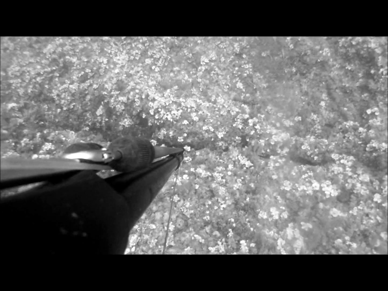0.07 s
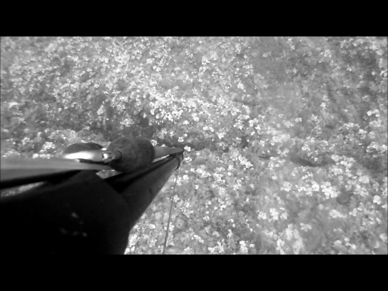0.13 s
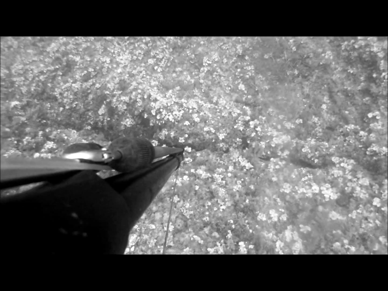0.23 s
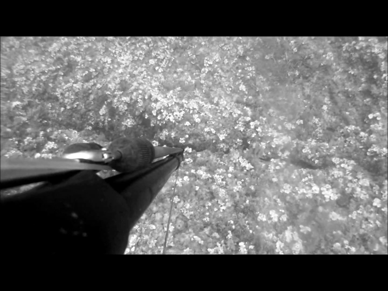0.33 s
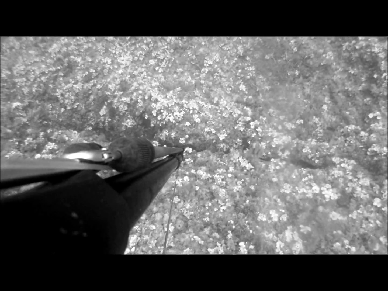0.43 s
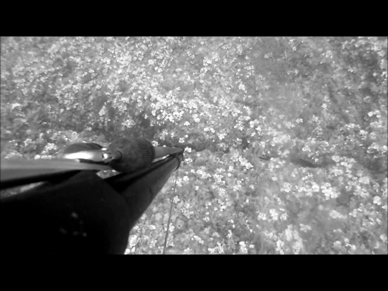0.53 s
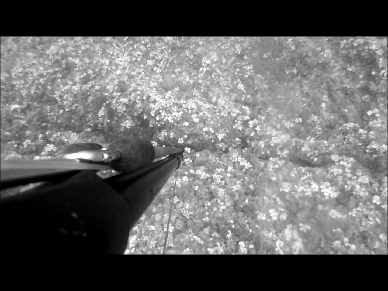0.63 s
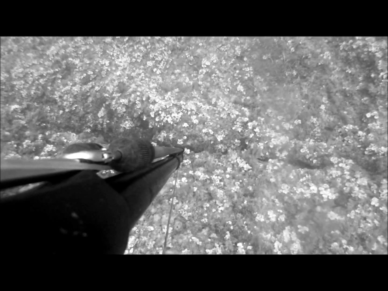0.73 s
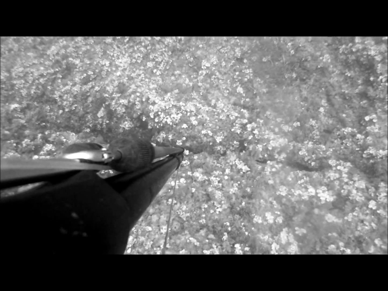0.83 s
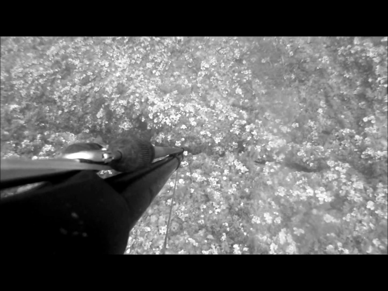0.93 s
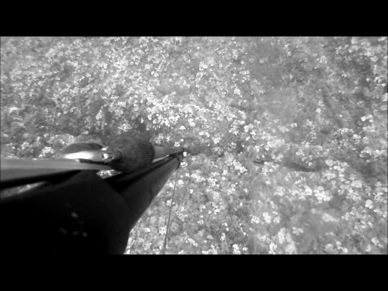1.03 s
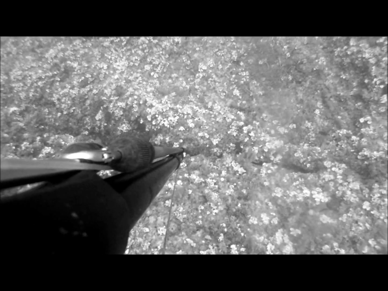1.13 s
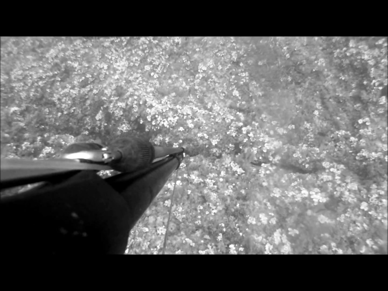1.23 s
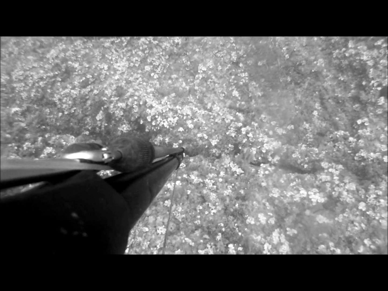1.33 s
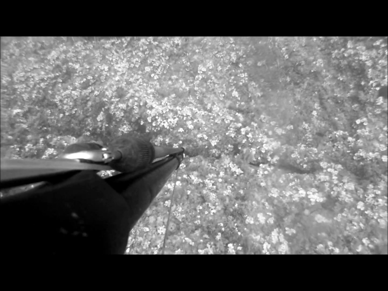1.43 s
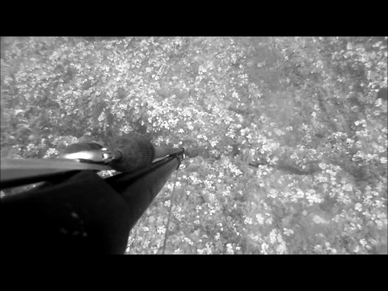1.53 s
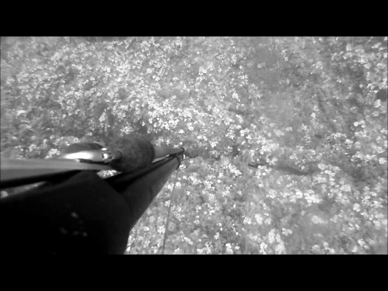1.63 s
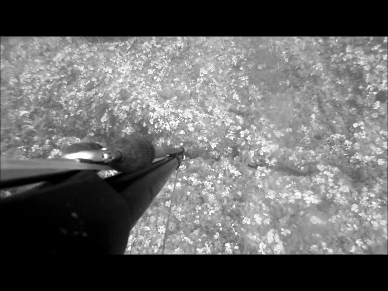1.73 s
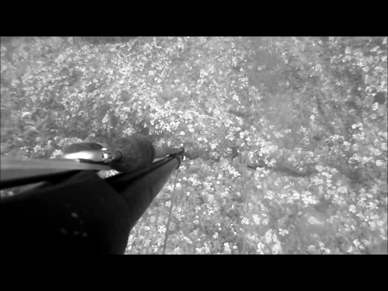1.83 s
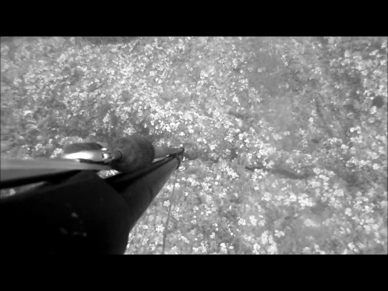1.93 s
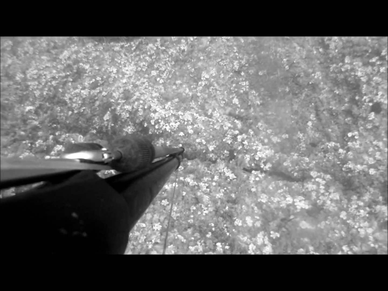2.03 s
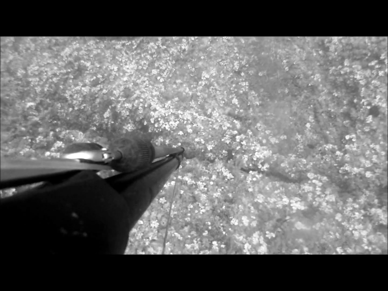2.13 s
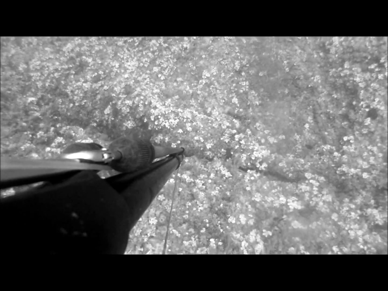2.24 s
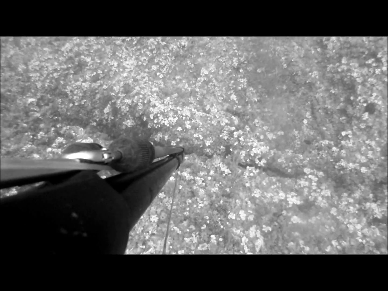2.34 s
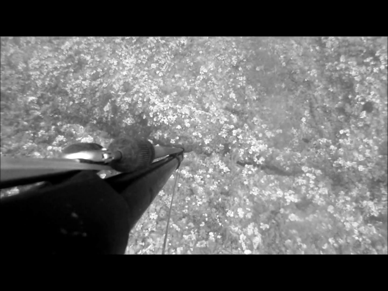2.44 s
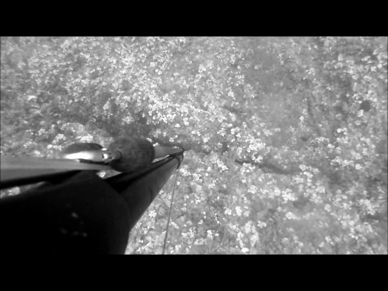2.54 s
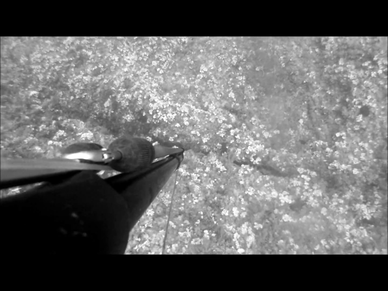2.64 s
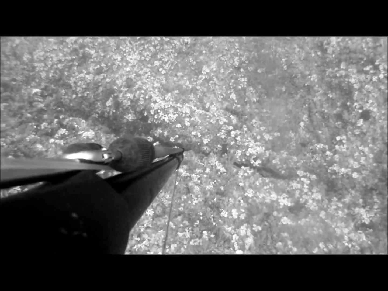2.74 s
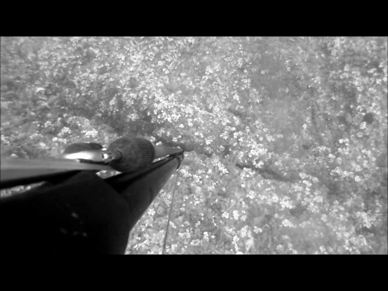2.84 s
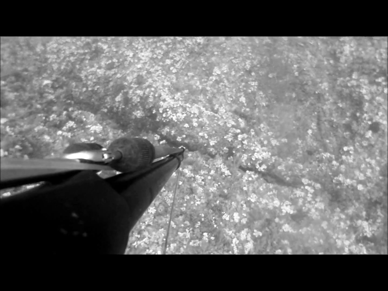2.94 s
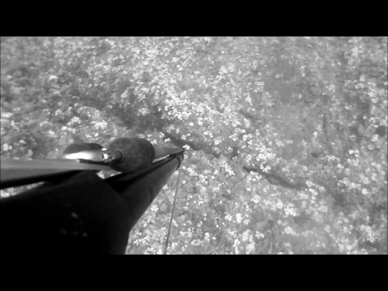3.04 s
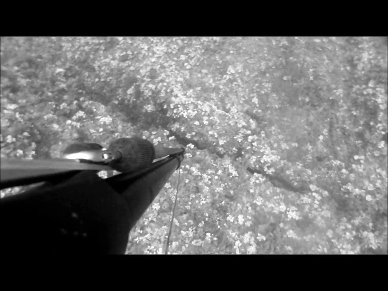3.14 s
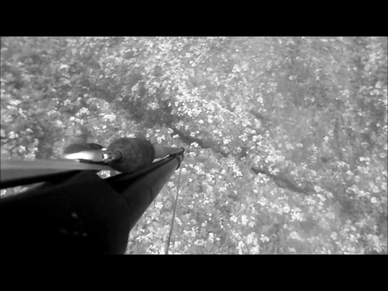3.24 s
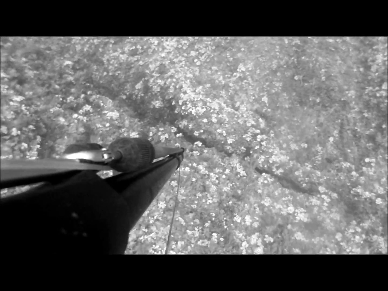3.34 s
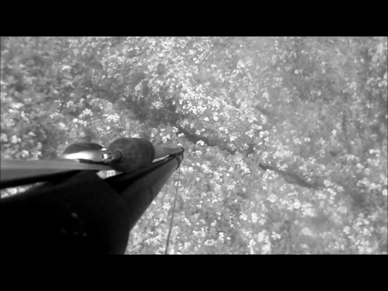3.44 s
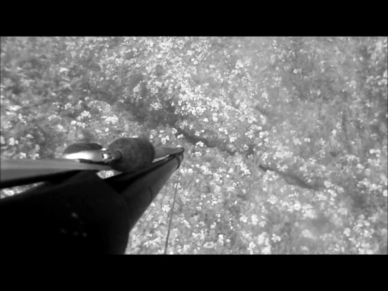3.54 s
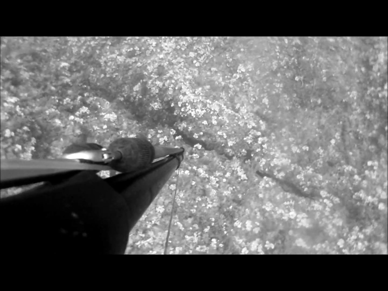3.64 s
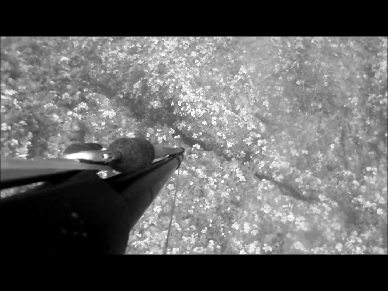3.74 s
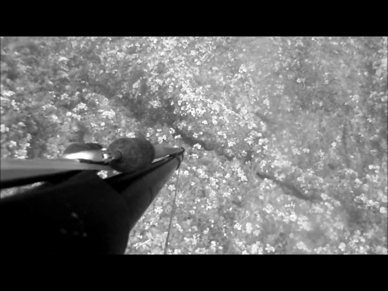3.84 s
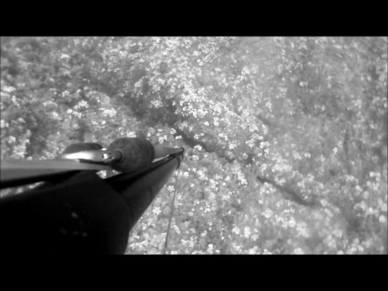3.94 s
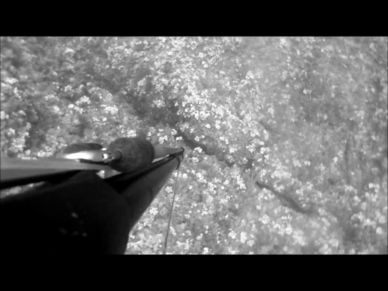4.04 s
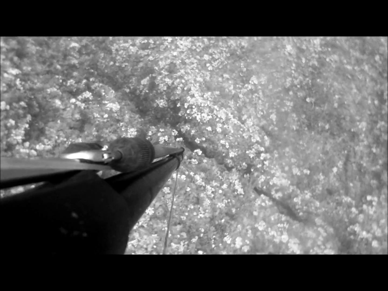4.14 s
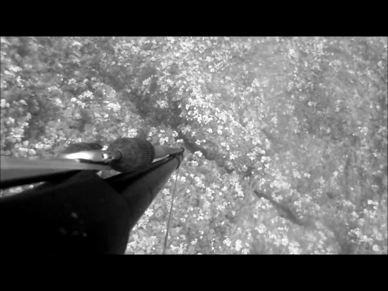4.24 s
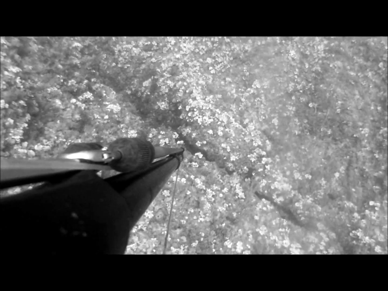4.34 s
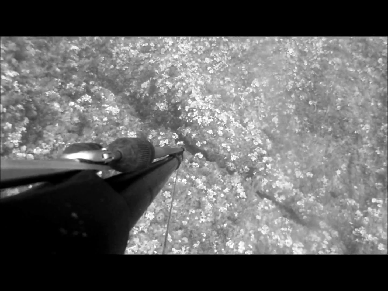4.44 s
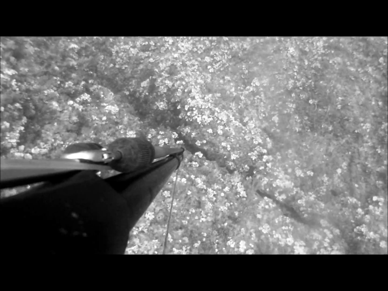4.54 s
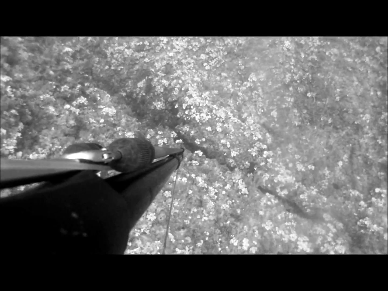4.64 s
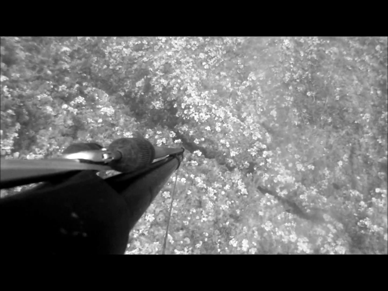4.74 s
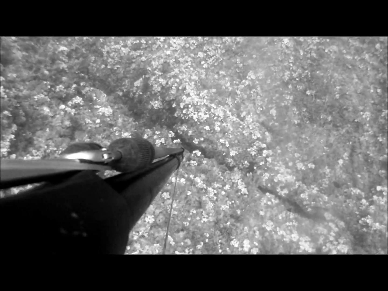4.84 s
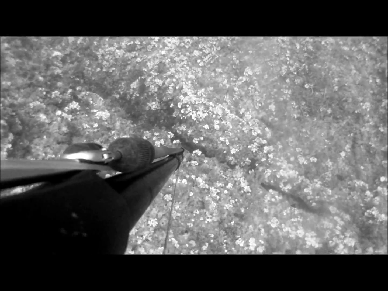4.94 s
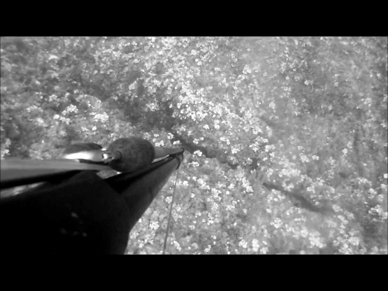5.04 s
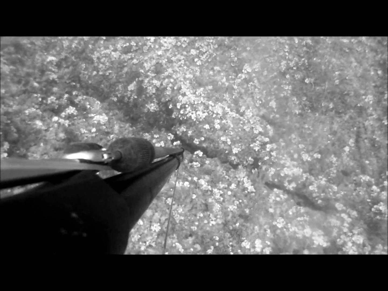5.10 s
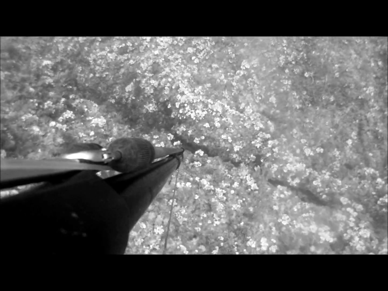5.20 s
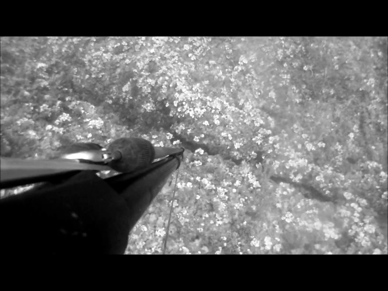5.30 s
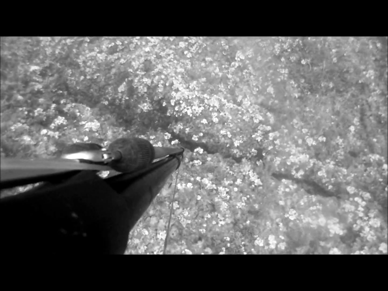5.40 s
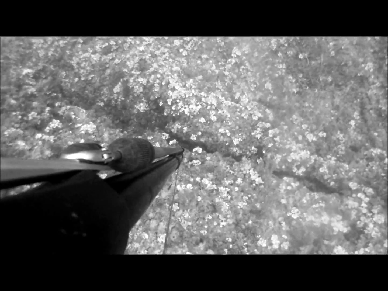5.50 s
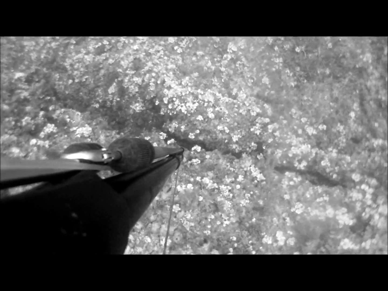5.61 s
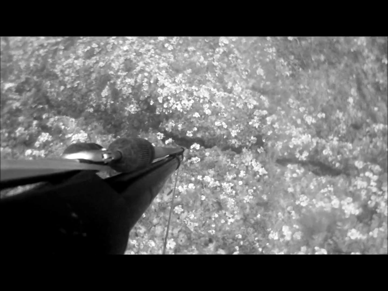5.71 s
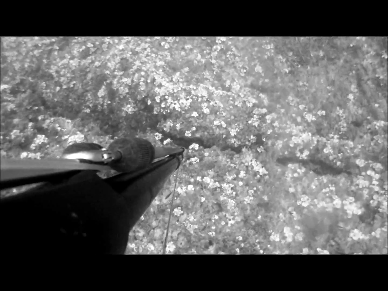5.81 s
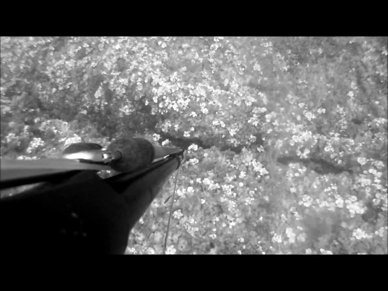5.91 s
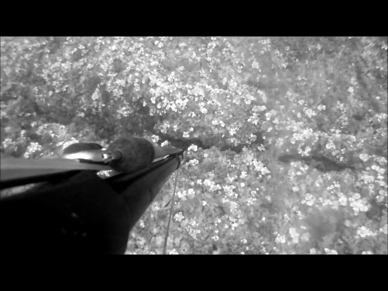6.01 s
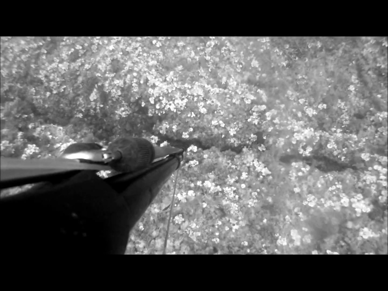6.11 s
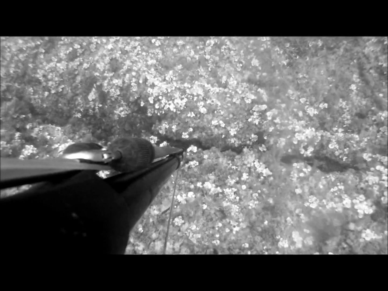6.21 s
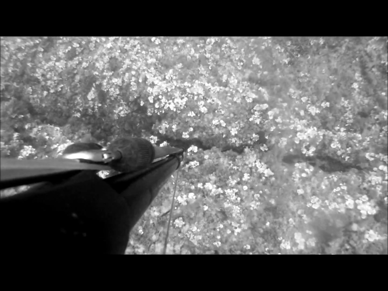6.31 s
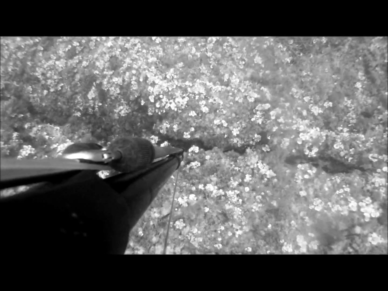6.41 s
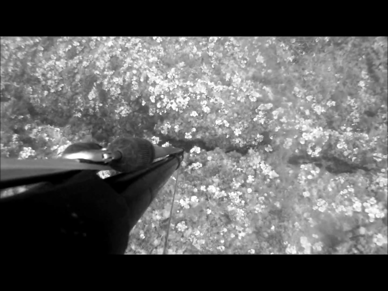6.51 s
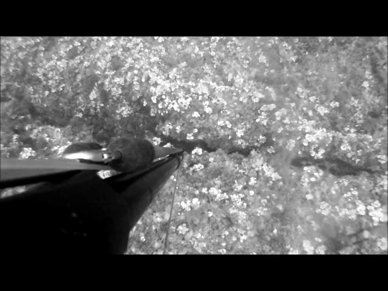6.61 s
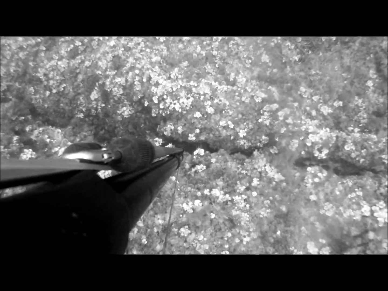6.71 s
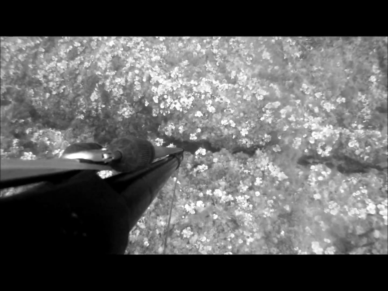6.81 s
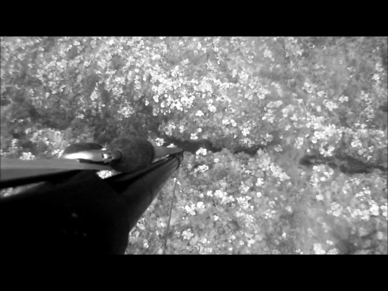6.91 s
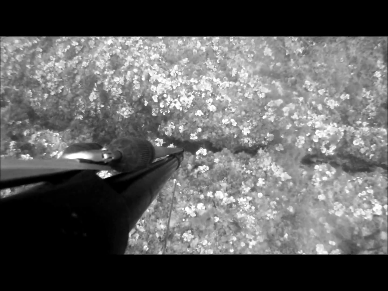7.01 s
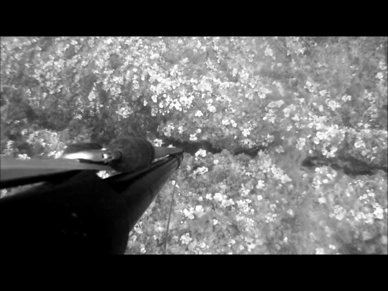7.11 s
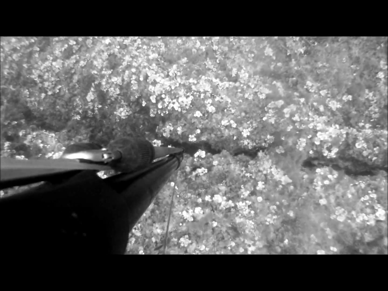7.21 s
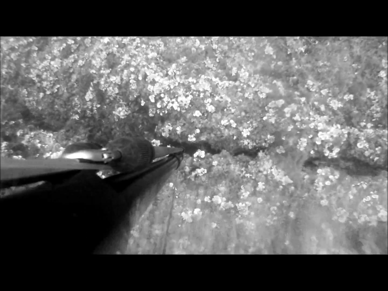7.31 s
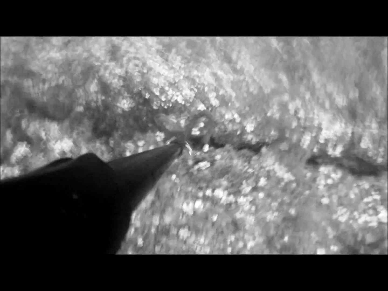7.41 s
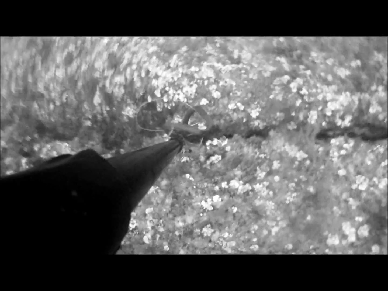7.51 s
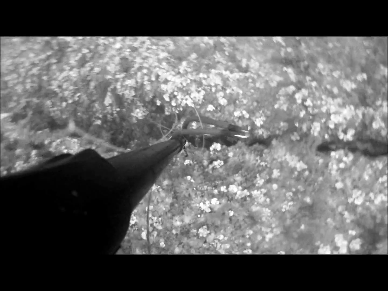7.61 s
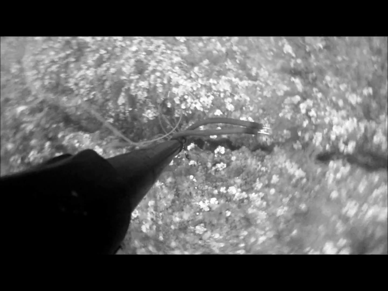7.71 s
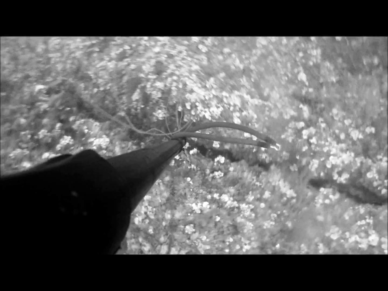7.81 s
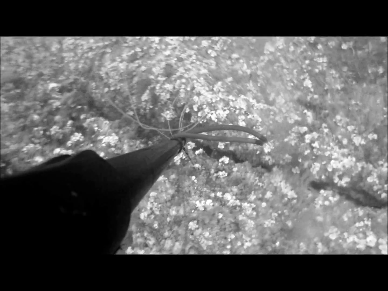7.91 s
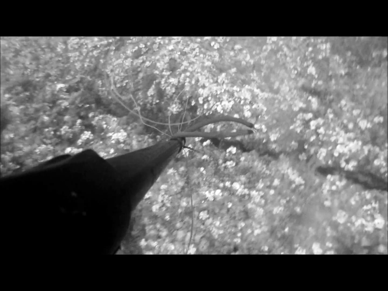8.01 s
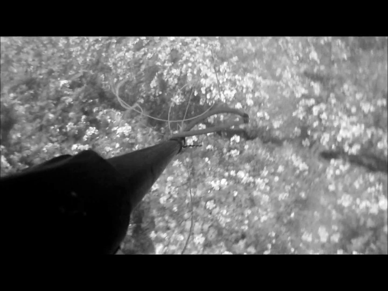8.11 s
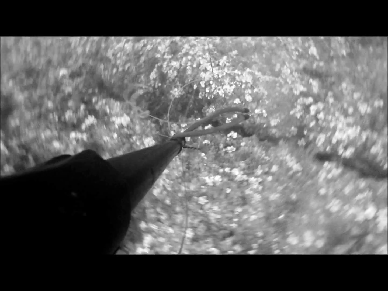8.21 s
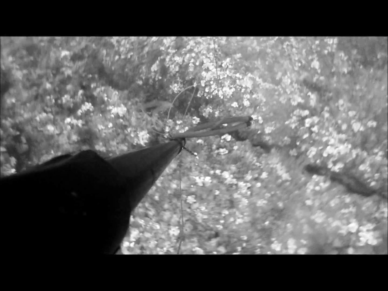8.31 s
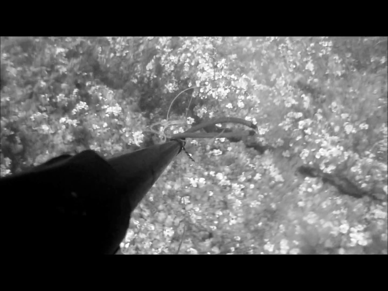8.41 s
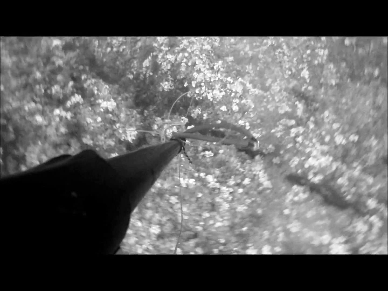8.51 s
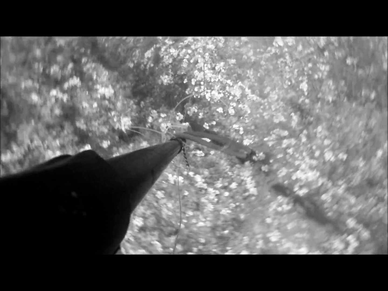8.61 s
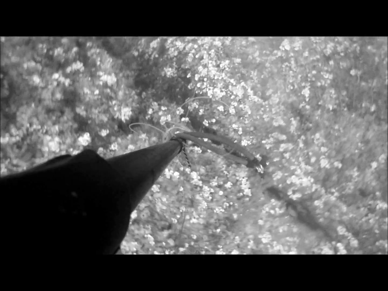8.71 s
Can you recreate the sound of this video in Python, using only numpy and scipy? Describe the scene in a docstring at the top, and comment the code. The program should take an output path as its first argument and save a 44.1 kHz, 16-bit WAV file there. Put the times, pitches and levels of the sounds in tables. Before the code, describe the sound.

Under the sea, a quiet bed of tiny shrimp clicks, hiss and deep water murmur. Hollow taps and small scrapes on the gun come in a cluster midway, then thin out into calm. A sudden loud speargun shot cracks, its thump falling quickly, and slack line and rubber clatter and rub amid churning gurgles until the end. Close, housed low-quality microphone, essentially mono, no room echo.

```python
"""Speargun shot over a reef

Under water, close: a camera fixed to a diver's speargun. Reef shrimp, near and far, are clicks and grainy hiss;
water round the housing is swelling noise; air pockets are gliding tones. The gun ticks and rubs as bursts through
its resonances, then fires: a rasp, a falling recoil tone, and rattling in churned water.
One microphone, sampled slowly with every sample held, mirrors its band into the treble."""
import sys
import numpy as np
from scipy import signal
from scipy.fft import rfft, irfft, next_fast_len
from scipy.io import wavfile
from scipy.ndimage import map_coordinates

SR = 44100
rng = np.random.default_rng(int(sys.argv[2]) if len(sys.argv) > 2 else 0)


def to_wav(s):
    """Save 16-bit WAV."""
    ch = np.atleast_2d(s).T  # columns
    pcm = np.round(np.clip(ch, -1, 1) * 32767)  # PCM
    wavfile.write(sys.argv[1], SR, pcm.astype(np.int16))


N = 385875

# Water past the housing, before its swells: time_s, rumble_db, gurgle_db
WATER_FLOW = [(0, -61.5, -65), (1.4, -59.5, -64.5), (2.25, -61.5, -62.5), (2.7, -53, -64),
              (3.7, -50.5, -54.5), (4.4, -55, -60), (5.2, -56.5, -58), (5.29, -58, -56), (5.5, -56, -59),
              (6.2, -51, -64), (7.38, -50, -64), (7.45, -37, -28), (7.56, -22, -50.5), (7.66, -39, -38),
              (7.76, -25, -37), (7.9, -39, -40.5), (8.12, -33.5, -42), (8.22, -25.5, -48),
              (8.36, -37.5, -47.5), (8.58, -38.5, -54), (8.68, -31, -52), (8.75, -40, -59)]
# Colour of the large eddies: frequency_hz, relative level_db_per_hz
RUMBLE_SPECTRUM = [(15, -59), (25, -9), (48, 10.5), (75, -0.5), (110, -10), (200, -73.5)]
# Colour of the small eddies: frequency_hz, relative level_db_per_hz
GURGLE_SPECTRUM = [(60, -42), (120, -2), (250, -6.5), (450, -9), (900, -33)]
# Far shrimp heard through the housing: frequency_hz, relative level_db_per_hz
REEF_SPECTRUM = [(180, -15), (300, -23.5), (385, -6.5), (561, -2), (1120, -4.5), (1650, -1.5), (2090, 6),
                 (2900, -6.5), (3590, 3), (4280, -9), (4910, 3.5), (5360, -9), (6000, 13), (7800, -76),
                 (13200, -120)]
# Housing resonances, two dull then two bright: centre_hz, width_hz, relative level_db
HOUSING_MODES = [(2055, 194, -0.5), (2846, 190, -8.5), (3200, 910, -2), (5300, 440, 2)]
# Near shrimp, before the housing and a random tilt: start_s, level_db
NEAR_SNAPS = [(0.0475, -36), (0.2748, -37.5), (0.7732, -37.5), (0.8372, -40.5), (0.9173, -37),
              (0.9272, -33), (1.0996, -42), (1.1965, -39.5), (1.5482, -36), (1.5993, -38), (1.779, -41.5),
              (1.915, -40), (2.2213, -35), (2.5224, -34), (2.559, -34), (2.8883, -34.5), (3.503, -34),
              (3.6285, -37), (3.7898, -37.5), (3.8434, -37.5), (3.9227, -34), (4.149, -34), (4.2198, -32.5),
              (4.8919, -33), (5.069, -41.5), (5.523, -36.5), (5.6191, -39), (5.9066, -30.5), (6.457, -34),
              (7.0524, -36), (7.093, -37), (7.3123, -33), (8.4185, -31.5), (8.5015, -36), (8.545, -32),
              (8.6738, -35.5)]
# Air shifting in a pocket, before flutter and waver: start_s, first_hz, last_hz, length_s, level_db
AIR_POCKETS = [(0.428, 130, 267, 0.016, -49), (1.373, 152, 280, 0.016, -42), (2.896, 254, 228, 0.03, -40.5),
               (4.888, 219, 467, 0.093, -47), (5.159, 483, 330, 0.021, -49), (5.268, 200, 231, 0.047, -42),
               (5.393, 230, 220, .025, -45), (7.435, 520, 480, 0.019, -21),
               (7.95, 177.5, 189, 0.049, -30.5), (8.12, 166, 187, 0.032, -35.5),
               (8.51, 443, 472, 0.058, -36.5), (8.63, 166, 199, 0.08, -41)]
# Resonances of barrel and handle: centre_hz, width_hz, relative level_db
GUN_MODES = [(190, 69, -0.5), (490, 100, -1), (1080, 240, -1), (1620, 280, -4), (2030, 230, -1)]
# Resonances of the camera mount: centre_hz, width_hz, relative level_db
MOUNT_MODES = [(3600, 440, 0), (5150, 1200, -6)]
# Bright edge of a hard contact: centre_hz, width_hz, relative level_db
CLICK_MODE = [(4200, 23000, 0)]
# Slips and knocks: start_s, ring level_db, ring_hz, click over the ring_db
SLIPS_AND_KNOCKS = [(0.871, -32, 840, -30), (0.97, -36.5, 490, -20), (2.843, -26, 1750, -20),
                    (2.845, -22.5, 455, -9), (2.926, -19, 1130, -38), (2.938, -24, 199, -11),
                    (2.999, -30.5, 610, -35), (3.045, -22, 442, -32), (3.278, -18.5, 1830, -4),
                    (3.413, -16, 543, -28), (3.43, -24, 500, -26), (3.45, -5.5, 2040, -35),
                    (3.47, -20, 860, -28), (3.614, -27, 480, 0), (3.711, -7.5, 1210, -42),
                    (3.739, -17, 514, -2), (3.752, -18, 895, -40), (3.767, -23, 473, -27),
                    (3.886, -26, 1330, -40), (3.906, -25.5, 850, -36), (4.064, -29, 533, -31),
                    (4.092, -28, 497, -31), (4.131, -22, 920, -5), (4.178, -29.5, 503, -37),
                    (4.202, -20, 490, -35), (4.503, -20.5, 790, -34), (4.557, -23, 1870, -21),
                    (4.569, -14, 1660, -35), (4.612, -25, 510, -35), (4.69, -20.5, 1870, -3),
                    (4.697, -16.5, 1260, -40), (4.744, -25.5, 490, -32), (4.889, -31.5, 480, -31),
                    (4.978, -30.5, 650, -25), (5.022, -32.5, 490, -33), (5.083, -33.5, 500, -30),
                    (5.468, -35, 397, -28), (5.717, -21, 3540, -22), (5.785, -33.5, 500, -12),
                    (5.812, -31, 2020, -15), (6.122, -31.5, 1500, 5.5), (6.272, -33.5, 516, -19),
                    (6.532, -23.5, 546, -30), (7.356, -18, 2010, -14), (7.437, -9, 1050, -30),
                    (7.448, -5, 2130, -30), (7.456, -2, 1940, -2.5), (7.478, -11.5, 2150, -17),
                    (7.498, -21, 1890, -8), (7.518, -11.5, 2120, 1.5), (7.551, -18, 1970, -3.5),
                    (7.568, -21, 2110, -33), (7.694, -18.5, 424, 3), (7.717, -19.5, 1060, -8.5),
                    (7.795, -2.5, 1220, -44), (7.82, -16, 490, -3), (7.84, -22, 2080, -26),
                    (7.893, -15, 523, -12), (8.01, -13.5, 1750, -12), (8.02, -16, 3630, -1),
                    (8.123, -17, 487, 6), (8.251, -12, 1570, -7), (8.315, -21, 426, -33.5),
                    (8.45, -29, 1110, 3.5), (8.529, -21, 464, -40)]
# Spans in which the gun is handled: start_s, end_s
HANDLED_SPANS = [(2.8, 5.15), (7.5, 8.2)]
# Rubbing strokes: start_s, length_s, favoured_hz, gun drive_db, mount drive_db
RUB_STROKES = [(2.824, 0.051, 654, -46, -52.5), (3.444, 0.037, 1010, -32.5, -66),
               (3.703, 0.068, 880, -45, -67), (4.203, 0.037, 396, -44.5, -72),
               (5.543, 0.11, 1530, -56.5, -73), (5.656, 0.056, 1000, -42.5, -55.5),
               (5.706, 0.05, 710, -42, -58), (5.752, 0.097, 620, -53, -64), (5.851, 0.044, 710, -48, -58),
               (7.494, 0.13, 1880, -39, -69), (7.59, 0.11, 1410, -41, -58.5), (7.681, 0.13, 590, -35, -53),
               (7.788, 0.12, 1500, -36.5, -52.5), (7.889, 0.12, 1680, -32.5, -53),
               (8.006, 0.12, 1270, -31, -54.5), (8.117, 0.11, 1010, -38.5, -53.5),
               (8.243, 0.057, 1920, -35.5, -48.5), (8.298, 0.075, 620, -43.5, -68),
               (8.505, 0.097, 940, -37.5, -65), (8.613, 0.086, 850, -44.5, -72)]
# Spear scraping out, bands slamming home, line paying out: time_s, drive_db before flutter
SHAFT_DRIVE = [(7.355, -47), (7.357, -38.5), (7.366, -22.5), (7.377, -15.5), (7.383, -24), (7.385, 5),
               (7.39, 3), (7.398, -21), (7.42, -27), (7.46, -32), (7.5, -32), (7.512, -50)]
# Camera swinging in the recoil: time_s, pitch_hz, level_db
RECOIL_SWING = [(7.3755, 125, -16), (7.379, 120, -7), (7.385, 85, -5), (7.39, 70, -3), (7.397, 55, -10),
                (7.406, 50, -30)]
# Faint hiss of the outputs: frequency_hz, relative level_db_per_hz
OUTPUT_SPECTRUM = [(30, -2.5), (7000, -16), (11000, -41.5)]

REEF_HISS_DB, OUTPUT_HISS_DB = -56.5, -81.5
FAINT_TICK_DB, FAINT_CLICK_DB = -36, -19  # base level of small slips; their click over the ring
SHAKE_DB = -14.5  # barrel noise relative to a tick's ring
DRAG_DB, AIR_DB = -14.5, -15  # barrel noise and freed air relative to a stroke's gun drive
SLIPS_PER_S, SMOOTH_DRAG = 260, .5
BLIPS_PER_S = 200
KEPT_RATE_HZ, HOLD = 12000, 4  # kept samples a second; times each is repeated
TOP_HZ = 15900  # upper limit of the output


def amp(db):
    """Amplitude for a level in dB."""
    return 10 ** (np.asarray(db) / 20)


def unit(x):
    """x scaled to rms 1."""
    return x / np.sqrt(np.mean(x ** 2) + 1e-20)


def curves(rows, outside=-120.):
    """One value per sample for each column after the time."""
    s, *cols = np.transpose(rows)
    return [np.interp(np.arange(N) / SR, s, c, outside, outside) for c in cols]


def wobble(rate):
    """A smooth random curve, rate knots a second."""
    knots = rng.standard_normal(int(N * rate / SR) + 4)
    return map_coordinates(knots, [np.arange(N) * rate / SR])


def filtered(x, response):
    """x times a complex response of frequency."""
    m = next_fast_len(N + SR // 2)
    return irfft(rfft(x, m) * response(np.fft.rfftfreq(m, 1 / SR)), m)[..., :N]


def noise(spectrum, force=1.):
    """Noise of rms 1, shaped in time by force, then coloured by (Hz, dB) points."""
    f, db = np.transpose(spectrum)
    colour = lambda hz: amp(np.interp(np.log(hz + 1), np.log(f), db))
    return unit(filtered(force * rng.standard_normal(N), colour))


def through(x, modes):
    """x ringing resonances of alternating sign, scaled so that white noise keeps its rms."""
    def gain(f):
        total = 0
        for k, (centre, width, db) in enumerate(modes):
            loss = 1j * f * width
            total = total + (-1) ** k * amp(db) * loss / (centre ** 2 - f * f + loss)
        return total
    return filtered(x, gain) / np.sqrt(np.mean(np.abs(gain(np.arange(SR // 2))) ** 2))


def burst(t, t60):
    """Noise dying away by 60 dB in t60 seconds."""
    return amp(-60 * t / t60) * rng.standard_normal(len(t))


def grains(per_s, t60, spread_db, clump_db):
    """An envelope of rms 1: sudden grains of uneven size that come in clumps and die away."""
    starts = rng.random(N) < per_s / SR * amp(clump_db * wobble(30))
    sizes = amp(spread_db * rng.standard_normal(N))
    decay = amp(-60 / (abs(t60) * SR))
    return unit(signal.lfilter([1], [1, -decay], starts * sizes))


def water():
    """Large eddies buffet the housing in swells; smaller ones gurgle."""
    rumble_db, gurgle_db = curves(WATER_FLOW)
    surge = wobble(8.3)  # shared by both
    rumble = amp(rumble_db + 2.5 * surge) * noise(RUMBLE_SPECTRUM)
    gurgle = amp(gurgle_db + 1.0 * surge + 3.35 * wobble(25)) * noise(GURGLE_SPECTRUM)
    return rumble + gurgle


def shrimp():
    """Each snap is a click with a scattered tail off the reef, dull or bright; countless far ones merge into hiss."""
    t = np.arange(SR // 14) / SR
    clicks = np.zeros((2, N + SR))  # dull, bright
    tail = amp(-60 * t / 0.007) + amp(-18 - 60 * t / 0.098)
    shape = (1 - np.exp(-t / 0.00021)) * tail
    far = rng.random((1100, 2))
    crowd = np.c_[far[:, 0] * N / SR, -61 - 4.5 * np.log(far[:, 1] + .025)]  # start_s, level_db
    for s, db in [*NEAR_SNAPS, *crowd]:
        tilt_db = rng.normal(0, 4.3) * np.array([[1], [-1]])
        clicks[:, round(s * SR):][:, :len(t)] += amp(db + tilt_db) * shape * rng.standard_normal(len(t))
    crackle = .55 + grains(350, t60=.02, spread_db=5, clump_db=3)
    hiss = amp(REEF_HISS_DB + .8 * wobble(2.73)) * noise(REEF_SPECTRUM, crackle)
    dull = amp(-1.0) * through(clicks[0, :N], HOUSING_MODES[:2])
    bright = amp(-0.5) * through(clicks[1, :N], HOUSING_MODES[2:])
    return hiss + dull + bright


def bubbles():
    """Short soft tones that glide and waver as the air pocket changes size."""
    out, waver, flutter_db = np.zeros(N), wobble(90), 3 * wobble(80)
    for s, first_hz, last_hz, length, db in AIR_POCKETS:
        u = np.linspace(0, 1, round(length * SR))
        here = slice(round(s * SR), round(s * SR) + len(u))
        hz = (first_hz + (last_hz - first_hz) * u) * (1 + 0.11 * waver[here])
        phase = 2 * np.pi * np.cumsum(hz) / SR
        tone = np.sin(phase) + amp(-10.5) * np.sin(2 * phase)
        out[here] += amp(db + flutter_db[here]) * np.sin(np.pi * u) * tone
    return out


def gun_modes(forces, order=1):
    """One force for each resonance of the gun, as no contact drives them all alike; a higher order rings purer."""
    out = np.zeros(N)
    for force, (hz, width, db) in zip(forces, GUN_MODES):
        for _ in range(order):
            force = through(force, [(hz, width * np.sqrt(order), 0)])
        out = out + amp(db) * force
    return out


def reach(hz, fall_db):
    """How well a contact that favours hz drives each resonance, falling off by the octave."""
    octaves = np.abs(np.log2(np.array(GUN_MODES)[:, :1] / hz))
    return amp(-fall_db * octaves)


def faint_ticks(count):
    """Rows of small slips scattered over the handled spans, each ringing near one resonance of the gun."""
    when, which, pitch, size = rng.random((count, 4)).T
    starts, ends = np.transpose(HANDLED_SPANS)
    span = np.arange(count) % len(HANDLED_SPANS)
    start_s = starts[span] + when * (ends - starts)[span]
    mode = 1 + (which * (len(GUN_MODES) - 1)).astype(int)  # the lowest one is left out
    hz = np.array(GUN_MODES)[mode, 0] * (.9 + .2 * pitch)
    after_shot_db = 10.0 * span  # the later span is louder
    level_db = FAINT_TICK_DB + after_shot_db - 8.0 * size
    return np.c_[start_s, level_db, hz, np.full(count, FAINT_CLICK_DB)]


def ticks():
    """Each slip clicks, briefly rings one part of the gun and shakes the resonances near it."""
    t = np.arange(SR // 16) / SR
    ring, edge = np.zeros((2, N + SR))
    barrel = np.zeros((len(GUN_MODES), N + SR))
    for s, db, hz, click_db in [*SLIPS_AND_KNOCKS, *faint_ticks(count=56)]:
        here = slice(round(s * SR), round(s * SR) + len(t))
        t60 = 0.0089 * (1000 / hz) ** 0.039
        onset = 1 - np.exp(-t / 0.00021)
        ring[here] += amp(db - 60 * t / t60) * onset * np.sin(2 * np.pi * hz * t)
        barrel[:, here] += amp(db + SHAKE_DB) * reach(hz, fall_db=4.0) * burst(t, 0.03)
        edge[here] += amp(db + click_db) * burst(t, 0.0022)
    return ring[:N] + gun_modes(barrel[:, :N]) + through(edge[:N], CLICK_MODE)


def blips(length, hz, count):
    """A stretch of small freed bubbles: short tones near hz that rise as they die."""
    t = np.arange(SR // 50) / SR
    out = np.zeros(round(length * SR) + len(t))
    for start, (pitch, size) in zip(rng.random(count), rng.standard_normal((count, 2))):
        f = hz * np.exp(.45 * pitch)
        tone = np.sin(2 * np.pi * f * t * (1 + 0.006 * f * t)) * (1 - np.exp(-t * f / 4.4))
        out[int(start * length * SR):][:len(t)] += amp(4 * size - 60 * t * f / 24) * tone
    return out[:round(length * SR)]


def rubbing():
    """Glove, line and slack rubber drag on the gun in tiny slips; each stroke bites fast, fades and frees air."""
    slips = SMOOTH_DRAG + grains(SLIPS_PER_S, t60=.03, spread_db=4, clump_db=2)
    # one noise for the mount, then one for each gun resonance
    grips = [unit(amp(3.0 * wobble(70)) * rng.standard_normal(N)) for _ in range(len(GUN_MODES) + 1)]
    gun = np.zeros((len(GUN_MODES), N))
    mount, air = np.zeros((2, N))
    for s, length, hz, gun_db, mount_db in RUB_STROKES:
        u = np.linspace(0, 1, round(length * SR))
        here = slice(round(s * SR), round(s * SR) + len(u))
        stroke = np.minimum(u / 0.1, 1) * (1 - u ** 2.5) * unit(slips[here])
        gun[:, here] += amp(gun_db) * reach(hz, fall_db=6.0) * stroke
        mount[here] += amp(mount_db) * stroke
        air[here] += amp(gun_db) * stroke * blips(length, hz, count=round(BLIPS_PER_S * length))
    gun_drag = amp(DRAG_DB) * gun_modes(gun * grips[1:], order=2)
    mount_drag = through(through(mount * grips[0], MOUNT_MODES), MOUNT_MODES)
    return gun_drag + mount_drag + amp(AIR_DB) * air


def shot():
    """The spear rasps along the barrel as noise while the recoil swings the camera in a brief falling tone."""
    rasp = amp(curves(SHAFT_DRIVE)[0] + 4.8 * wobble(300)) * rng.standard_normal(N)
    barrel = gun_modes(amp(-2.5) * reach(1700, fall_db=5.0) * rasp)
    edge = amp(-3.0) * through(rasp, CLICK_MODE)
    hz, db = curves(RECOIL_SWING)
    swing = -amp(db) * np.sin(2 * np.pi * np.cumsum(np.maximum(hz, 0)) / SR)
    return barrel + edge + swing


def scene():
    """All the sources summed, the same on both channels."""
    mono = water() + shrimp() + bubbles() + ticks() + rubbing() + shot()
    return np.tile(mono, (2, 1))


def record(dry):
    """One microphone, sampled slowly and clipped; holding every sample mirrors the band round the sampling rate."""
    edge = lambda hz: np.clip((KEPT_RATE_HZ / 2 - hz) / 400, 0, 1)
    band = filtered(dry[0], lambda hz: edge(hz) / (1 + (hz / 5500) ** 16))
    kept = signal.resample(band, round(N * KEPT_RATE_HZ / SR))
    kept = kept / (1 + np.abs(kept / .92) ** 8) ** (1 / 8)  # rounded clipping
    held = signal.resample(np.repeat(kept, HOLD), N)
    apart = amp(OUTPUT_HISS_DB) * noise(OUTPUT_SPECTRUM)  # faint hiss, opposite in the two outputs
    outputs = np.array([held + apart, held - apart])
    return filtered(outputs, lambda hz: 1 / (1 + (hz / TOP_HZ) ** 60))


dry = scene()
out = record(dry)
to_wav(out)
```